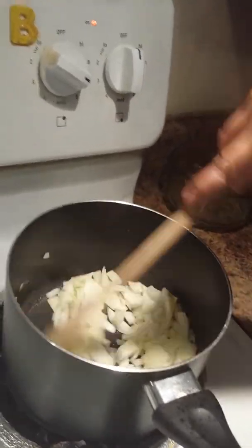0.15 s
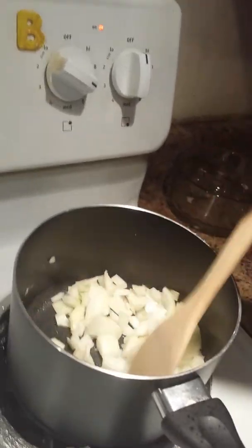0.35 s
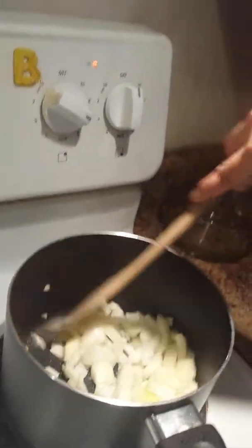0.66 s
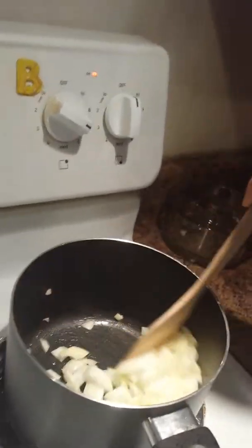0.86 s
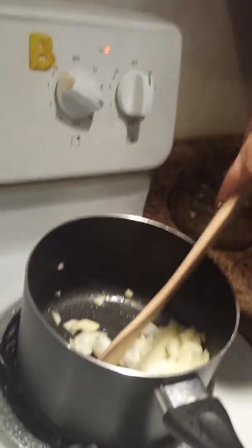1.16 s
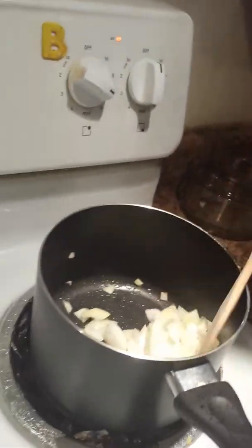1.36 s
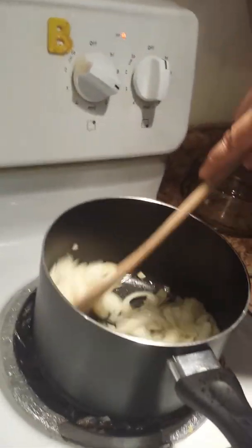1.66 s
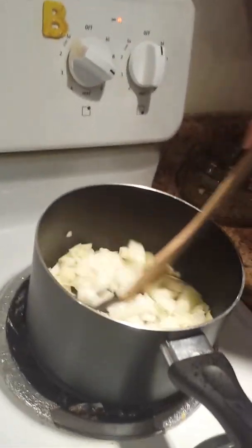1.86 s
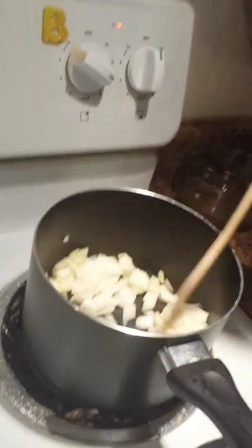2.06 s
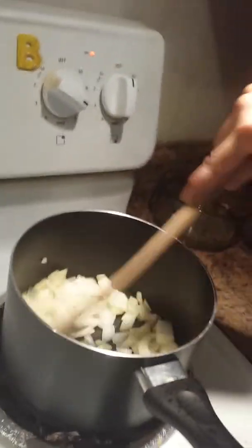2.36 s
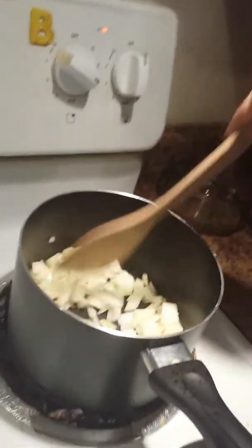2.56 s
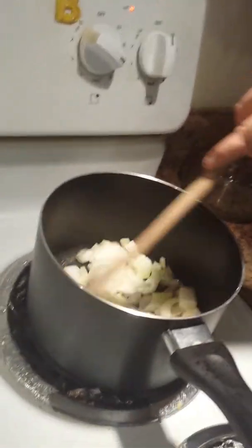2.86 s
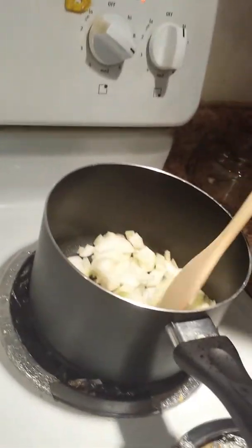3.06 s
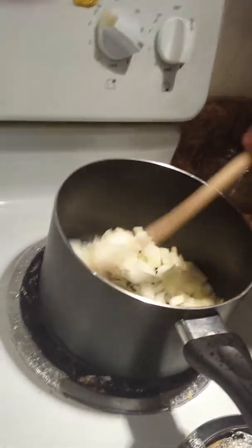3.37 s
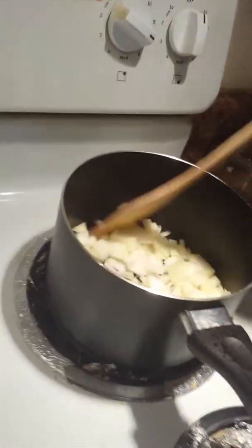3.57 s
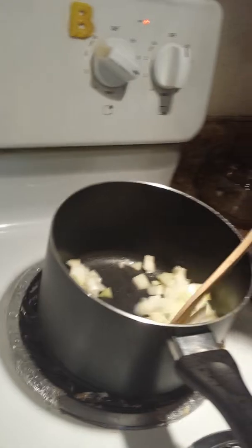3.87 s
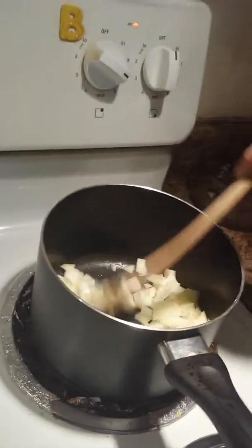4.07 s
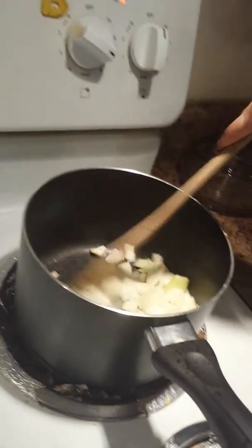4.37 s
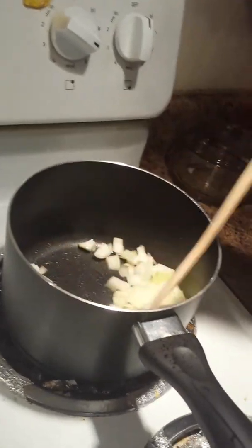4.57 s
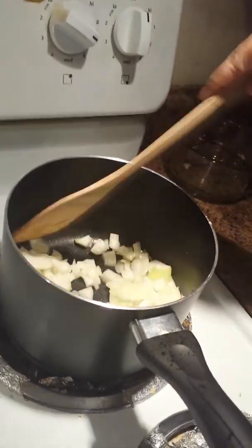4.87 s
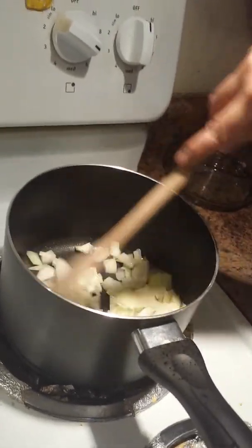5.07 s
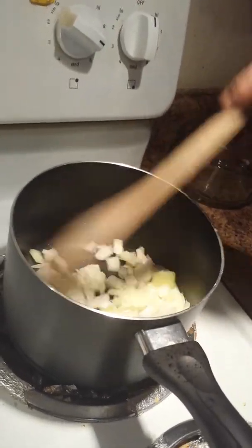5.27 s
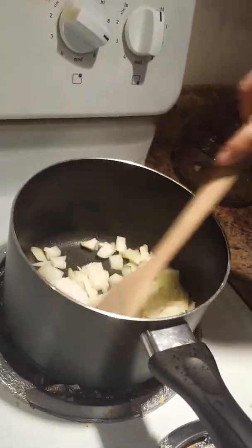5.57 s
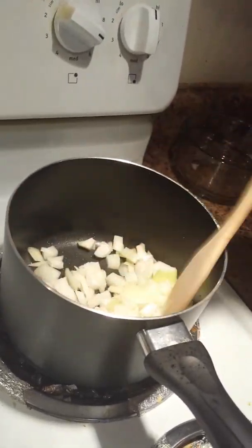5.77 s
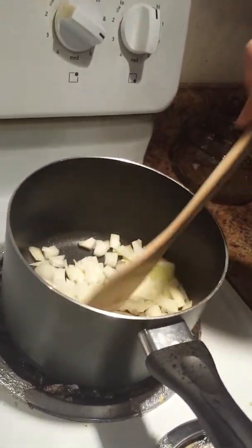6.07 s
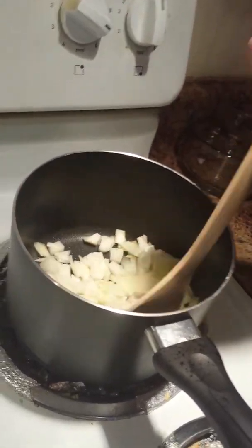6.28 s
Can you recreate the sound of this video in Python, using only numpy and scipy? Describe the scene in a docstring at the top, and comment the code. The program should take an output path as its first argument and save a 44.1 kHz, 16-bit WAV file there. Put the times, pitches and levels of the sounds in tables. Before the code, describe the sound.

Close, irregular wooden taps and swishing scrapes ring a nonstick pot while onions fizz softly in oil over faint fan noise.

```python
"""A wooden spoon knocks and scrapes in a saucepan of diced onions, close to a two-port microphone.
Blows are short noisy contacts with a sharp push, strokes are noisy friction: both excite the pan's modes.
Single modes also sing out, and the pan thuds and rumbles as it rocks on its burner.
Shaped noise gives the faint sizzle, the spits of the oil and the fan's hum and air rush behind.
The small kitchen answers with decaying noise tails."""
import sys
import numpy as np
from scipy import signal
from scipy.fft import rfft, irfft, next_fast_len
from scipy.io import wavfile
from scipy.ndimage import uniform_filter1d, map_coordinates

SR = 44100
rng = np.random.default_rng(int(sys.argv[2]) if len(sys.argv) > 2 else 0)


def store_wav(level_fs):
    """Save 16-bit WAV to argv[1]."""
    pcm = np.round(np.clip(np.atleast_2d(level_fs), -1, 1) * 32767)
    wavfile.write(sys.argv[1], SR, pcm.T.astype(np.int16))


N = 283563
t = np.arange(N) / SR

# Background. Spectra give relative density: f/Hz, level/dB per Hz
FAN_SPECTRUM = [(15, -45), (25, -44.5), (98, -2), (162, 0), (216, -1.5), (324, -1.5), (386, -9.5), (525, 2),
                (601, -8.5), (834, -8.5), (1250, -13.5), (1430, -51), (2500, -45), (3250, -46),
                (5500, -120)]
# fan tones: f/Hz, width/Hz before 1 Hz is added, level/dB against the air rush
FAN_TONES = [(59.2, 12, -12.5), (169.8, 6.6, -6), (533, 4.2, -9.5)]
# wavering level of the low background: t/s, relative level/dB
LOW_BACKGROUND_LEVEL = [(0.0, -64), (.8, -50.5), (2.04, -56.5), (3, -49), (4.06, -61), (5.5, -49.5),
                        (6.43, -49)]
# steady sizzle: f/Hz, level/dB per Hz
SIZZLE_SPECTRUM = [(820, 7), (1400, 6), (3420, -4.5), (4910, -2.5), (8020, -2.5), (12600, -12),
                   (14100, -15), (15400, -41)]
# steady sizzle: t/s, level/dB
SIZZLE_LEVEL = [(0.0, -62.5), (.45, -63), (.95, -59), (1.7, -54.5), (2.5, -55), (3.2, -53), (3.55, -52.5),
                (4.1, -62.5), (4.55, -57.5), (5.3, -54), (6.43, -49)]
# brighter fizz of turned onions: f/Hz, level/dB per Hz
FIZZ_SPECTRUM = [(1500, -5.5), (3400, -3), (6300, -2), (9500, 0), (13000, -12.5), (14800, -26),
                 (15400, -47)]
# fizz of freshly turned onions: t/s, level/dB against the hiss of the stroke
STIRRED_LEVEL = [(0.0, 3.5), (.6, -6.5), (1.1, -7), (1.5, -2), (1.9, -2), (2.3, 2.5), (2.7, -2),
                 (2.85, 4.5), (3.0, 6), (3.6, 2.5), (4.4, 2), (5.0, -3.5), (5.5, -2.5), (5.95, 3.5),
                 (6.43, 2.5)]
# left-right likeness of fan and sizzle: f/Hz, correlation (1 = identical)
ALIKE = [(60, 0.24), (130, 0.95), (300, 0.68), (700, 0.57), (1500, 0.043), (14900, .02)]

# modes of the pan: f/Hz, width/Hz before 5 Hz and damping, relative level/dB,
# level/dB gained when the side is struck and lost when the bottom is
PAN_MODES = [(481, 14, -6, 8), (527, 30, 0, -7), (565, 40, -4, -4), (640, 8, -3, 6), (760, 25, -5, -5),
             (912, 8, -3, 6), (1184, 25, -9, 4), (1250, 45, -2, -5), (1491, 8, -3, 4), (1772, 30, -2, -5),
             (1811, 30, -1, -3), (1958, 35, -4, 3), (2168, 35, 1, -2), (2367, 22, -5, 2),
             (2800, 120, -8, 0), (3740, 22, 0, 2), (4160, 30, -4, 1), (4530, 35, -6, 0), (4738, 30, -3, -1),
             (4990, 30, -4, 2), (5440, 60, -8, 0), (6725, 60, -2, 0), (6975, 55, -5, 2), (7240, 70, -7, 0),
             (7540, 110, -8, 0), (8220, 90, -7, 0)]
# broad response of the pan wall: f/Hz, relative level/dB
WALL = [(300, -23.5), (1000, -15.5), (3000, -6.5), (5000, -8), (8000, -16.5), (11000, -29.5), (15000, -65)]
# moments when a blow or a rub catches one mode:
# t/s, rise t/s, hold t/s, f/Hz, level/dB, left over right level/dB
SINGS = [(0.064, 0.0033, 0.0096, 2530, -27.5, 6.5), (0.066, 0.0034, 0.01, 4890, -26, 4),
         (0.57, 0.011, 0.068, 6800, -39, 17), (0.658, 0.034, 0.04, 1773, -27.5, -2),
         (0.667, 0.015, 0.012, 6700, -28, 10), (0.694, 0.0035, 0.0067, 2160, -14.5, 9),
         (0.696, 0.0039, 0.013, 529, -25, 1), (0.723, 0.0098, 0.094, 3720, -40, 12),
         (0.726, 0.02, 0.055, 6850, -31.5, 9.5), (0.79, 0.015, 0.012, 4660, -36, 8),
         (1.379, 0.0024, 0.0099, 5024, -21, 3), (1.384, 0.009, 0.021, 3710, -27.5, -2),
         (1.467, 0.052, 0.038, 1794, -43, 5), (1.519, 0.0036, 0.022, 1793, -38.5, 7),
         (1.545, 0.0026, 0.01, 732, -41, 1), (1.597, 0.02, 0.053, 6800, -48, 4),
         (1.909, 0.0049, 0.018, 565, -52, -3), (2.014, 0.0026, 0.0056, 1223, -38, -5),
         (2.018, 0.0026, 0.018, 597, -44, -3), (2.744, 0.024, 0.03, 6670, -41, 10),
         (2.851, 0.0075, 0.052, 553, -35.5, 1), (3.299, 0.0039, 0.0039, 1697, -21, 9.5),
         (3.3, 0.0013, 0.0065, 534, -22, -2), (3.3, 0.0047, 0.015, 1244, -20.5, 1),
         (3.3, 0.0033, 0.026, 759, -26, 2), (3.335, 0.0094, 0.049, 682, -33.5, -9),
         (3.612, 0.002, 0.02, 4240, -26, -4), (3.67, 0.0031, 0.0061, 8420, -32.5, -6),
         (3.672, 0.0045, 0.0073, 1900, -28.5, 11), (3.671, 0.0048, 0.0075, 568, -28.5, 1),
         (4.203, 0.0051, 0.0099, 1268, -40, -1), (4.265, 0.0031, 0.0056, 4910, -29.5, 18),
         (4.36, 0.0027, 0.013, 1956, -32, 5), (4.361, 0.0027, 0.0086, 553, -24.5, 3.5),
         (4.939, 0.0037, 0.008, 5025, -20, 11), (4.94, 0.0025, 0.022, 3796, -29, -6),
         (5.047, 0.019, 0.026, 1910, -45, -4), (5.11, 0.0053, 0.029, 530.0, -43.5, 3),
         (5.406, 0.00325, 0.021, 3760, -29, -6), (5.5, 0.045, 0.029, 6730, -38.5, 20),
         (5.535, 0.019, 0.012, 1850, -30.5, 3), (5.556, 0.0055, 0.025, 2074, -39, 3),
         (5.597, 0.0032, 0.0072, 1248, -23, 4), (5.61, 0.0014, 0.0082, 543, -25, 0),
         (5.987, 0.0035, 0.011, 1832, -31.5, 9.5), (6.335, 0.0065, 0.014, 2810, -48, -3),
         (6.391, 0.003, 0.0055, 8900, -28, -7), (6.393, 0.0069, 0.011, 1239, -19, -7),
         (6.392, 0.0019, 0.0035, 1785, -15, 10.5)]
# blows of the spoon: t/s, relative strength level/dB, hardness/dB per octave,
# hollowness/dB per octave squared, relative thud level/dB, contact t/s (60 dB decay)
KNOCKS = [(0.066, -27, 3, 1.97, -51, 0.0056), (0.203, -46, 0.7, 2, -55, 0.032),
          (0.616, -44.5, -2.5, 2, -69, 0.0092), (0.694, -14, -0.5, -0.86, -41, 0.011),
          (1.044, -55, 3.5, 5, -62, 0.016), (1.081, -47, 4.5, 3, -58, 0.027),
          (1.19, -60, 5, 5.5, -56, 0.0087), (1.381, -20.5, 7.5, 0.95, -51, 0.013),
          (1.515, -36, 5, 0.6, -42, 0.032), (1.831, -44, -4, -1.7, -72, 0.012),
          (1.914, -51, -3, 3, -64, 0.01), (2.016, -54, -7, 0.5, -73, 0.028),
          (2.257, -41, -2, -1.5, -60, 0.034), (2.607, -61.5, 11, 2.5, -73, 0.018),
          (2.712, -46.5, 5, 4, -49.5, 0.016), (2.815, -58.5, -4, 2.5, -36.5, 0.03),
          (3.299, -18.5, -2, 0.67, -48, 0.016), (3.611, -20, 6.5, 1, -60, 0.039),
          (3.67, -21, 1, 0.4, -46.5, 0.015), (4.013, -45, 6, 3, -70, 0.033),
          (4.181, -59.5, -5, 3, -74, 0.036), (4.266, -23.5, 4.5, 0.5, -59.5, 0.0155),
          (4.362, -22.5, -1, -0.5, -46, 0.0099), (4.673, -45, 4, 2.4, -51, 0.0126),
          (4.938, -14.5, 3.5, 0.54, -51, 0.018), (5.406, -27, 3.5, 0.5, -70, 0.069),
          (5.41, -14, 1.2, 0, -43.5, 0.016), (5.452, -23, 2.5, 0.5, -45, 0.095),
          (5.596, -39.5, -4, -0.1, -39.5, 0.013), (5.954, -36, 4, -1, -55, 0.018),
          (5.964, -44, 10.5, 2.5, -38.5, 0.017), (5.989, -28, -2, 0.14, -35.5, 0.042),
          (6.392, -19, 1.5, 1.13, -41.5, 0.036)]
# blows that land on the side of the pan: t/s
ON_SIDE = [0.066, 1.381, 3.611, 4.266, 4.938, 5.406, 5.41, 5.452]
# edges of the blow's six ranges, top to bottom: f/Hz
BLOW_EDGES = np.array([[np.inf], [7700], [5800], [3000], [1500], [720], [450]])
# how strongly a blow reaches each range: level/dB
BLOW_REACH_DB = np.array([14.7, 19.5, 30.6, 33.2, 30.2, 24.63])
# centres of those ranges against 2 kHz: octaves
OCTAVES = np.array([2.2, 1.8, 1, 0, -1, -2])
# strokes through the onions: t/s, rise t/s, hold t/s, fall t/s, hiss level/dB,
# hardness/dB per octave, weight level/dB
STROKES = [(0.133, 0.04, 0.039, 0.38, -49.5, 5, -52.5), (0.533, 0.0041, 0.024, 0.076, -41, 11, -47.5),
           (0.555, 0.06, 0.16, 0.62, -38, 5, -48), (0.579, 0.0031, .004, .02, -37, 4, -65),
           (0.664, 0.029, 0.0032, 0.012, -26, 7, -61), (0.728, 0.062, 0.06, 0.064, -37, 13.5, -41),
           (0.773, 0.004, 0.0092, .02, -57, 6, -65), (1.023, 0.012, 0.057, 0.31, -53.5, 3, -49),
           (1.376, 0.0048, 0.15, 0.04, -42, 1.5, -75), (1.503, 0.014, 0.16, 0.078, -45, 8, -55),
           (1.515, .006, 0.014, 0.027, -40, -1.5, -48), (1.801, 0.022, 0.0069, 0.12, -52.5, 7, -72),
           (1.86, 0.084, 0.015, 0.1, -46.5, 2.5, -41.5), (2.116, 0.026, 0.033, 0.14, -61.5, 12, -74),
           (2.241, 0.031, 0.0036, 0.08, -41.5, 3, -57), (2.297, 0.13, 0.25, 0.11, -53.5, 7, -55),
           (2.694, 0.025, 0.063, 0.097, -43, 7, -65), (2.787, 0.046, 0.074, 0.018, -36, 12, -44.5),
           (2.893, 0.032, 0.049, 0.16, -42.5, 6.5, -44), (3.056, 0.17, 0.046, 0.086, -59, 17, -57),
           (3.246, 0.004, 0.022, 0.018, -54, 27, -62), (3.298, 0.0039, 0.039, 0.16, -38.5, 0.5, -30),
           (3.706, 0.027, 0.026, 0.18, -54, 1, -47.5), (3.986, 0.031, 0.0027, 0.02, -46.5, 1, -43),
           (4.051, 0.021, 0.019, 0.22, -60, 5, -50.5), (4.376, 0.012, 0.018, 0.16, -52, 2, -42),
           (4.591, 0.1, 0.0089, 0.062, -51.5, 10, -48), (4.985, 0.048, 0.082, 0.33, -41, 9, -50.5),
           (5.448, 0.11, 0.033, 0.015, -32.5, 5.5, -63), (5.546, 0.017, 0.01, 0.033, -49.5, -2.5, -40.5),
           (5.595, 0.004, 0.021, 0.018, -48.5, 0.5, -27), (5.764, 0.041, 0.0093, 0.28, -49.5, 3.5, -64),
           (5.93, 0.022, 0.0097, 0.11, -44, 0.5, -34), (6.042, 0.12, 0.17, 0.077, -55.5, 20, -70),
           (6.319, 0.029, .005, 0.031, -45.5, 14, -73), (6.367, .005, 0.0067, 0.033, -53, 23, -73)]
# edges of the four friction ranges, top to bottom: f/Hz
FRICTION_EDGES = np.array([[np.inf], [5800], [3000], [1400], [440]])
# spits of oil: t/s, relative level/dB
SPITS = [(0.355, -35.5), (2.135, -34), (2.44, -26), (3.1038, -32), (3.901, -34.5), (4.152, -43),
         (4.8628, -41), (5.701, -29.5)]

# decay of the room: f/Hz, t60 t/s
KITCHEN = [(200, 0.32), (2000, 0.25), (10000, 0.19)]
# lead of the left port for sound of the pan: f/Hz, phase/rad
PORT_LEAD = [(260, -1.9), (690, 0.77), (1290, 1.59), (2410, 1.54), (3300, 2.5), (4390, -1.5), (6720, -1.5),
             (13500, -2)]
# colour of the ports: f/Hz, left over right level/dB
PORT_DB = [(60, -1.5), (200, 1.5), (700, 2), (2370, 1), (4380, 1.5), (8090, -0.5), (14900, -17.5)]

TOP_HZ = 15500
STROKE_FALL_DB = 30  # lost over the fall time of a stroke
SING_FALL_S = 0.016
SING_SHARP, SING_BLUR_HZ = 110, 22  # a singing mode wavers over Hz / sharp + blur
BLOW_RISE_S, SLOWER_DB = 0.0016, .25  # rise at zero hardness, lengthened per dB of softness
PUSH_DB, PUSH_GROWS, PUSH_DEEP_DB = -5.5, 0.087, 3  # sharp push, gain per dB of hardness, per octave down
MID_DB = -9  # friction at 3-5.8 kHz against the straight slope
ASIDE_DB = 4  # how much a mode's strength varies from port to port
ONIONS_DAMP = 1.5  # modes are this much wider under a blow on the covered bottom
ROCKING_DB = -12  # low rumble of the pan under a stroke
THUD_HZ = 420  # the pan gives way softly: little above this
OPPOSED = np.array([[.5], [-.5]])  # shares a left-right difference between the ports


def amp(db):
    """Level definition: amplitude ratio from decibels."""
    return 10 ** (np.asarray(db) / 20)


def unit(x):
    """Normalization to an rms of 1."""
    return x / np.sqrt(np.mean(x ** 2) + 1e-20)


def along(points, hz):
    """Interpolation of (f, value) points along a logarithmic frequency axis."""
    f, v = np.transpose(points)
    return np.interp(np.log(hz + 1), np.log(f + 1), v)


def curves(rows):
    """Linear interpolation in time: one value per sample for each column after t."""
    s, *columns = np.transpose(rows)
    return np.array([np.interp(t, s, column) for column in columns])


def wobble(rate):
    """Random modulation: a smooth curve through `rate` random knots a second."""
    knots = rng.standard_normal(int(N * rate / SR) + 4)
    return map_coordinates(knots, [t * rate])


def filtered(x, response):
    """Linear filtering: the spectrum of x times a response of frequency."""
    m = next_fast_len(N + SR // 2)
    return irfft(rfft(x, m) * response(np.fft.rfftfreq(m, 1 / SR)), m)[..., :N]


def peak(f, hz, width):
    """Damped resonance: the causal response of a single mode."""
    return 1j * f * width / (hz * hz - f * f + 1j * f * width)


def rush(spectrum, source):
    """Partial coherence: two unrelated noises, coloured and mixed to a stereo pair of rms 1."""
    def response(hz):
        turn = np.arccos(np.clip(along(ALIKE, hz), -1, 1)) / 2
        return amp(along(spectrum, hz)) * [np.cos(turn), np.sin(turn)]
    mid, side = filtered(source, response)
    return unit(np.array([mid + side, mid - side]))


def fan():
    """Broadband flow noise with narrow resonances: an air rush and a few wavering tones."""
    air = amp(1.5 * wobble(7)) * rush(FAN_SPECTRUM, rng.standard_normal((2, N)))
    tones = np.zeros(N)
    for hz, width, db in FAN_TONES:
        tone = filtered(rng.standard_normal(N), lambda f: peak(f, hz, width + 1) ** 2)
        tones += amp(db) * unit(tone)
    return amp(curves(LOW_BACKGROUND_LEVEL) + 4.5) * (air + tones)


def sizzle(hiss):
    """Impulsive bubble noise: steam bursts in oil as spiky grains, brighter while the onions are turned."""
    def grains():
        size = amp(2.1 * rng.exponential(size=(2, N)))
        present = rng.random((2, N)) < .03
        spikes = unit(size * present * rng.standard_normal((2, N)))
        return spikes * .45 + rng.standard_normal((2, N))
    steady_level = amp(curves(SIZZLE_LEVEL) + 1.5 * wobble(8))
    steady = steady_level * rush(SIZZLE_SPECTRUM, grains())
    fizz_level = amp(curves(STIRRED_LEVEL) + 1.5 * wobble(60)) * hiss
    return steady + fizz_level * rush(FIZZ_SPECTRUM, grains())


def stroke(u, rise, hold, fall):
    """Envelope of an excitation: sets in linearly, holds and dies away exponentially."""
    rise = max(rise, .0015)
    onset = np.clip(u / rise, 0, 1)
    return onset * amp(-STROKE_FALL_DB * np.clip(u - rise - hold, 0, 2) / fall)


def sings():
    """Phase diffusion of an excited mode: it sounds for a moment, jolted by uneven slips of the wood."""
    out, u = np.zeros((2, N + SR)), np.arange(SR // 4) / SR
    flutter = np.pad(amp(2.5 * wobble(90)), (0, SR))
    for s, rise, hold, hz, db, left_db in SINGS:
        start = round(s * SR)
        jolt_size = np.sqrt(2 * np.pi * (hz / SING_SHARP + SING_BLUR_HZ) / SR)
        jolts = np.cumsum(rng.standard_normal(len(u))) * jolt_size
        phase = 2 * np.pi * hz * u + uniform_filter1d(jolts, size=round(2 * SR / hz))
        tone = np.sqrt(2) * np.sin(phase)
        tone *= stroke(u, rise, hold, SING_FALL_S) * flutter[start:][:len(u)]
        out[:, start:][:, :len(u)] += amp(db + left_db * OPPOSED) * tone
    return out[:, :N]


def pan_rings(force, edges, place, dull_hz, damping, wall_db, spot_db, wander):
    """Modal superposition: forces, from hard to soft contact, each excite their own range of modes.

    place is 1 on the side, -1 on the bottom. The contact wanders between three spots, with wander
    random knots a second; each spot favours other modes, a little differently at the two ports."""
    m = next_fast_len(N + SR // 2)
    f = np.fft.rfftfreq(m, 1 / SR)
    modes = np.array([(-1) ** k * amp(db + place * side_db) * peak(f, hz, (width + 5) * damping)
                      for k, (hz, width, db, side_db) in enumerate(PAN_MODES)])

    def steep(u):
        return 1 / (1 + np.sqrt(2) * u + u * u) ** 2
    s = 1j * (f + 1)
    ranges = steep(s / edges[:-1]) * steep(edges[1:] / s) * steep(s / dull_hz)

    near = amp(10 * np.array([wobble(wander) for _ in range(3)]))
    shares = near / np.linalg.norm(near, axis=0)  # constant total power
    favour_db = spot_db * rng.standard_normal((3, 1, 1, len(PAN_MODES)))
    favour_db = favour_db + ASIDE_DB * rng.standard_normal((3, 2, 1, len(PAN_MODES)))
    spots = amp(favour_db - favour_db.mean(axis=0))

    out = 0
    for share, spot in zip(shares, spots):
        response = ranges * (amp(along(WALL, f) + wall_db) + spot @ modes)
        response /= np.sqrt(np.mean(abs(response) ** 2, axis=(0, 2), keepdims=True))
        out = out + (rfft(force * share, m) * response).sum(axis=1)
    return irfft(out, m)[:, :N]


def knocks():
    """Impact excitation: one sharp push and a short rattling contact; harder blows favour higher modes."""
    force = np.zeros((2, len(OCTAVES), N + SR))  # bottom, side
    u = np.arange(SR // 8) / SR
    for s, db, hard_db, hollow_db, _, contact in KNOCKS:
        rise = BLOW_RISE_S * amp(-SLOWER_DB * hard_db)
        rattle = amp(-60 * u / contact) * (1 - np.exp(-u / rise)) ** 2
        rattle *= rng.standard_normal(len(u))
        blow = np.tile(0.52 * rattle / np.linalg.norm(rattle), (len(OCTAVES), 1))
        push = amp(PUSH_DB + PUSH_GROWS * hard_db - PUSH_DEEP_DB * OCTAVES)
        blow[:, 8:11] += push[:, None] * np.hanning(5)[1:4] / 2.29  # a wooden edge: three samples wide
        colour_db = db + hard_db * OCTAVES + hollow_db * OCTAVES ** 2 + BLOW_REACH_DB
        on_side = int(np.isclose(s, ON_SIDE, atol=.0025).any())
        force[on_side, :, round(s * SR):][:, :len(u)] += amp(colour_db)[:, None] * blow
    force = force[..., :N]
    settings = dict(dull_hz=11500, wall_db=6.0, spot_db=2, wander=8)
    bottom = pan_rings(force[0], BLOW_EDGES, -1, damping=ONIONS_DAMP, **settings)
    side = pan_rings(force[1], BLOW_EDGES, 1, damping=1, **settings)
    return bottom + side


def thuds(weight):
    """Rigid-body resonance: the pan rocks on its burner under each blow and rumbles under each stroke."""
    push = amp(ROCKING_DB + 23.5) * weight * rng.standard_normal((2, N))
    for s, *_, db, _ in KNOCKS:
        lean_db = rng.normal(0, 2.3) * np.array([1, -1])
        push[:, round(s * SR)] += amp(db + 66.0 + lean_db)

    def rocking(f):
        main = peak(f, 141.0, 14) * peak(f, 198, 290)
        low = amp(-15.5) * peak(f, 79, 59)
        high = amp(-12.5) * peak(f, 278, 29)
        return (main + low + high) / (1 + 1j * f / THUD_HZ) ** 2
    return filtered(push, rocking)


def kitchen(x):
    """Reverberant decay: each frequency dies at its own speed, with a fresh tail per stretch of sound."""
    out, step = np.zeros((2, N + 2 * SR)), SR // 3
    for start in range(0, N, step):
        hz, u, z = signal.stft(rng.standard_normal((2, SR // 2)), SR, nperseg=256)
        decay = amp(-60 * u / along(KITCHEN, hz)[:, None])
        tail = signal.istft(z * decay, SR, nperseg=256)[1]
        tail = tail / np.linalg.norm(tail[0])
        wet = signal.fftconvolve(x[None, start:start + step], tail, axes=1)
        out[:, start + 130:][:, :wet.shape[1]] += wet  # the answer lags by 130 samples
    return out[:, :N]


def pressure():
    """Friction force in four ranges, top to bottom: every stroke sets in, holds and dies away."""
    out = np.zeros((4, N))
    for s, rise, hold, fall, hiss_db, hard_db, weight_db in STROKES:
        range_db = [[hiss_db], [hiss_db - hard_db + MID_DB], [hiss_db - 2 * hard_db], [weight_db]]
        out += amp(range_db) * stroke(t - s, rise, hold, fall)
    return out


def scrape(push):
    """Stick-slip friction: wood drags over the coating in tiny uneven slips, pressure fluttering."""
    flutter = wobble(60) + 2 * np.array([wobble(120) for _ in FRICTION_EDGES[1:]])
    slips = rng.standard_normal((4, N)) * amp(3.5 * wobble(350) + wobble(25) + flutter)
    return pan_rings(unit(slips) * push, FRICTION_EDGES, 0, dull_hz=26400, damping=0.91,
                     wall_db=1.5, spot_db=5, wander=45)


def spits():
    """Explosive vaporization: a drop of water bursts in the oil with a short bright puff."""
    puffs, u = np.zeros(N + SR), np.arange(SR // 20) / SR
    for s, db in SPITS:
        decay = amp(db - 6.5 - 60 * u / 0.076)
        puffs[round(s * SR):][:len(u)] += decay * rng.standard_normal(len(u))
    return filtered(puffs[:N], lambda f: peak(f, 6700, 4700) ** 2)


def scene():
    """Superposition of sources: the pan reaches the two microphone ports by different paths."""
    push = pressure()
    pan = knocks() + scrape(push) + sings() + spits()
    ports = filtered(pan, lambda f: np.exp(1j * OPPOSED * along(PORT_LEAD, f)))
    room = amp(-7.0) * kitchen(pan.mean(axis=0))
    return ports + room + thuds(push[3]) + sizzle(push[0]) + fan()


def record(dry):
    """Transducer response: the ports differ in colour, loud peaks are rounded off, the band is limited."""
    heard = filtered(dry, lambda hz: amp(OPPOSED * along(PORT_DB, hz)))
    heard = heard / (1 + (heard / .88) ** 8) ** (1 / 8)
    return filtered(heard, lambda hz: hz < TOP_HZ)


dry = scene()
out = record(dry)
store_wav(out)
```